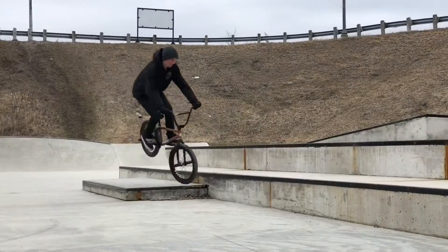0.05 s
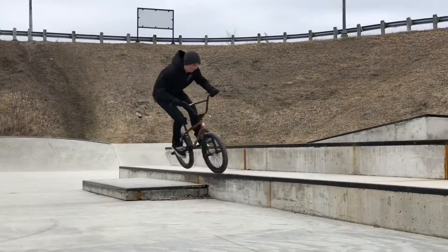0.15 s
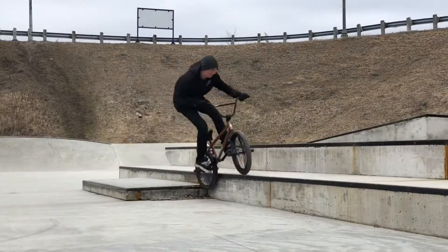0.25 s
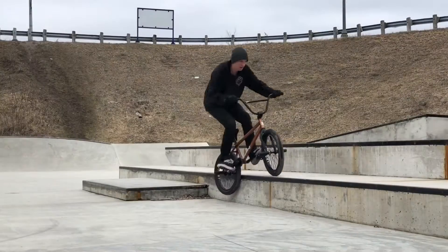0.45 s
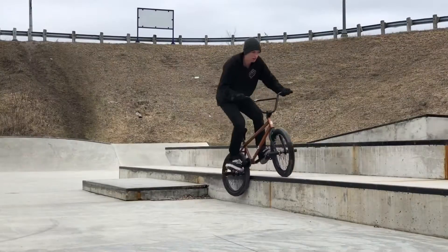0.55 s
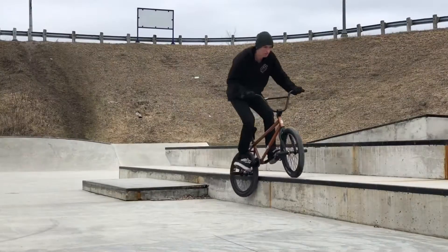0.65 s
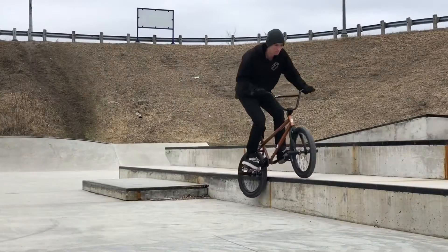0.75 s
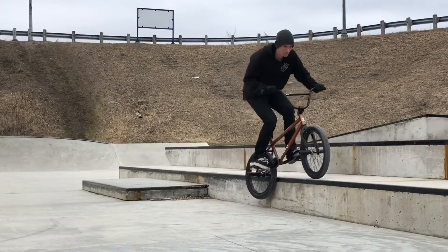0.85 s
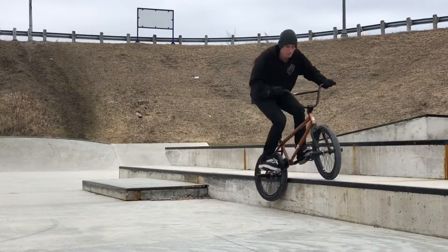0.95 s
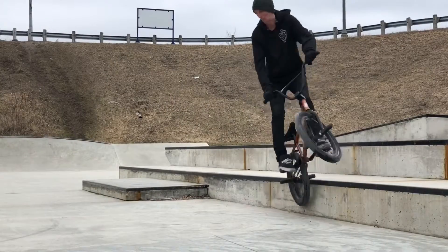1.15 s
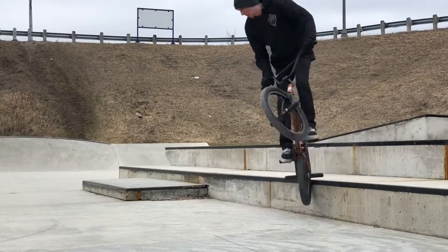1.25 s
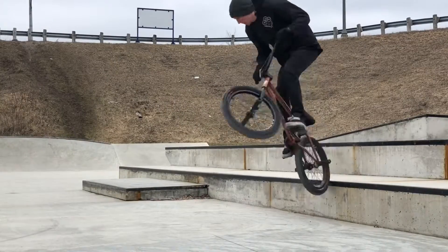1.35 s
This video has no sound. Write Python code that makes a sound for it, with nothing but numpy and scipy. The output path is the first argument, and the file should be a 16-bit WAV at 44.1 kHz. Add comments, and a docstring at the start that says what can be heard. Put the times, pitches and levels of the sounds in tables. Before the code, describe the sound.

A bicycle grinds along a concrete ledge at an outdoor skatepark. A sharp, rattling knock comes first, then a juddering, gritty scrape with hissing scuffs, and a few small clacks as it leaves, over faint low rumble.

```python
"""Bicycle peg grind

A stunt bicycle hops onto a concrete ledge in an open skatepark. The rear peg lands with a hard double
knock that rings the frame, judders in stick-slip as it starts to slide, then scrapes along the edge
with hissing scuffs. The bicycle clatters off; concrete banks answer faintly over a low outdoor rumble."""
import sys
import numpy as np
from scipy import signal
from scipy.fft import rfft, irfft, next_fast_len
from scipy.io import wavfile
from scipy.ndimage import uniform_filter1d

SR = 44100
rng = np.random.default_rng(int(sys.argv[2]) if len(sys.argv) > 2 else 0)


def dump(signal):
    """Clip the signal to [-1, 1] and save it as 16-bit WAV at the path in sys.argv[1]."""
    limited = np.clip(np.atleast_2d(signal).T, -1, 1)
    pcm = np.round(limited * 32767).astype(np.int16)
    wavfile.write(sys.argv[1], SR, pcm)


N = 61739

# Spectrum of metal striking concrete: freq_hz, density_db
IMPACT_SPECTRUM = [(100, -16), (600, 2), (1200, -2), (2200, -8.5), (3000, -8.5), (4800, -7.5),
                   (6000, -13.5), (8200, -11), (10000, -26), (13200, -17.5), (16000, -35.5)]


def undb(db):
    """Decibels to gain."""
    return np.exp(np.asarray(db) * np.log(10) / 20)


def unit(x):
    """Scale to rms 1."""
    return x / np.sqrt(np.mean(x ** 2))


def since(start_s):
    """Seconds since start_s, zero before it."""
    return np.maximum(np.arange(N) / SR - start_s, 0)


def fade(age_s, t60_s):
    """Exponential decay, 60 dB in t60_s."""
    return np.exp(-np.log(1000) * age_s / t60_s)


def add(out, start_s, sound):
    """Mix sound into out from start_s on."""
    i = int(np.clip(start_s * SR, 0, N - 1))
    out[i:i + len(sound)] += sound[:N - i]


def butter(x, kind, cutoff_hz):
    """Second-order low-pass or high-pass."""
    return signal.sosfilt(signal.butter(2, cutoff_hz, kind, fs=SR, output="sos"), x)


def colour(x, spectrum):
    """Filter by (freq_hz, gain_db) points; rms 1."""
    freq_hz, gain_db = np.array(spectrum).T
    size = next_fast_len(N, real=True)
    bins_hz = np.maximum(np.fft.rfftfreq(size, 1 / SR), 1)
    gain = undb(np.interp(np.log(bins_hz), np.log(freq_hz), gain_db))
    return unit(irfft(rfft(x, size) * gain, size)[:N])


def walk(rate_hz):
    """Smooth random wander; rms 1."""
    span = max(int(SR / rate_hz), 1)
    return unit(uniform_filter1d(uniform_filter1d(rng.standard_normal(N), span), span))


def grit(size=N):
    """Dense tiny collisions of uneven size."""
    grains_per_s, spread_db = 9000, 2.5
    grains = (rng.random(size) < grains_per_s / SR) * rng.standard_normal(size)
    return grains * undb(spread_db * rng.standard_normal(size))


def ring(modes):
    """Damped modes struck together, from (freq_hz, level_db, t60_s) rows."""
    age_s = np.arange(int(max(t60_s for _, _, t60_s in modes) * SR)) / SR
    return sum(undb(db) * np.sin(2 * np.pi * hz * age_s) * fade(age_s, t60_s) for hz, db, t60_s in modes)


def snaps(contacts):
    """Noise snaps of hard contact, from (start_s, level_db) rows."""
    decay_s = 0.0017
    decay = np.exp(-since(0)[:SR // 20] / decay_s)
    envelope = np.zeros(N)
    for start_s, level_db in contacts:
        add(envelope, start_s, undb(level_db) * decay)
    return envelope * colour(rng.standard_normal(N), IMPACT_SPECTRUM)


def air():
    """Low outdoor rumble that wavers slightly and slowly eases."""
    # Rumble spectrum: freq_hz, density_db
    spectrum = [(20, 0.5), (50, 0), (120, -0.5), (230, -8.5), (350, -7), (700, -15.5), (1300, -19),
                (2500, -29.5), (5000, -42), (9000, -47.5), (16000, -53.5)]
    mean_db, swell_db, fall_db_per_s = -49, 1, 1.5
    level_db = mean_db + swell_db * walk(rate_hz=6) - fall_db_per_s * (since(0) - N / SR / 2)
    return colour(rng.standard_normal(N), spectrum) * undb(level_db)


def banks(source):
    """Faint, dull reflections off the concrete banks."""
    level_db, delay_s = -28.5, 0.018
    age_s = since(delay_s)
    tail = butter(grit(), "lowpass", cutoff_hz=1503) * (age_s > 0) * fade(age_s, t60_s=0.65)
    return undb(level_db) * signal.fftconvolve(source, tail / np.linalg.norm(tail))[:N]


def ticks():
    """Thin ticks of the rolling bicycle before and after the ledge."""
    # Ticks: start_s, level_db
    contacts = [(.0174, -49.5), (.0283, -60.5), (.0533, -52.5), (.063, -54.5), (.0732, -56.5),
                (1.258, -54.5), (1.371, -67.5)]
    return butter(snaps(contacts), "highpass", cutoff_hz=4000)


def clacks():
    """Glancing blows of the peg: a snap and a short hollow ring."""
    # Blows: start_s, ring_db, snap_db, low_modes_db
    blows = [(0.1778, -24, -22, -9.5), (0.1799, -44, -36.5, 10), (0.2286, -38.5, -58, 10.5),
             (0.36, -32, -49, 3), (.496, -42, -54, 6), (1.138, -47.5, -57, 9.5), (1.141, -32, -42.5, 2.5),
             (1.1432, -38, -44, 0), (1.154, -42, -41, -17), (1.172, -36, -57, 1)]
    # Peg and hub modes: freq_hz, level_db, t60_s
    peg_modes = [(373.7, -9, 0.091), (636, -6.5, .07), (727, -16, 0.055), (1004, -1, 0.0094),
                 (1431, -1, .013), (1657, 4, 0.0083), (3830, -27.5, 0.0077)]
    low_below_hz = 1200
    out = snaps([(start_s, snap_db) for start_s, _, snap_db, _ in blows])
    for start_s, ring_db, _, low_modes_db in blows:
        modes = [(hz, db + low_modes_db * (hz < low_below_hz), t60_s) for hz, db, t60_s in peg_modes]
        add(out, start_s, undb(ring_db) * ring(modes))
    return out


def scuffs():
    """Rough patches of the edge give short swells of hiss that ring in the steel."""
    # Gaussian swells: centre_s, sigma_s, level_db, centre_hz, sigma_octaves
    swells = [(.448, 0.01, -48, 4930, 0.38), (0.451, 0.022, -60.5, 11000, 0.73),
              (0.501, 0.021, -52, 2600, 1), (0.559, 0.0085, -48.5, 7300, 0.19),
              (0.568, 0.019, -58, 12300, .3), (0.589, 0.016, -56.5, 4715, 0.4),
              (.655, 0.0055, -59, 8150, 1), (0.845, 0.013, -60.5, 7860, 0.33),
              (0.894, 0.013, -49.5, 4200, 0.69), (0.895, 0.011, -53, 10900, 0.87),
              (0.932, 0.01, -51.5, 10700, 0.96), (0.971, 0.0098, -51, 4480, 0.76),
              (1.014, 0.022, -64, 4840, 0.32), (1.104, 0.021, -66.5, 9900, .5),
              (1.163, 0.011, -54, 4630, 0.64), (1.213, 0.013, -57.5, 3700, 0.79)]
    # Steel resonances: freq_hz, width_hz, boost_db
    resonances = [(2626, 89, 13), (3170, 100, 9), (3730, 60, 10.5), (4030, 46, 3), (5050, 110, 5),
                  (5570, 90, 8.5), (7100, 220, 5), (8320, 120, 12), (12900, 250, 8)]
    size = 8192
    bins_hz = np.maximum(np.fft.rfftfreq(size, 1 / SR), 1)
    offset_s = (np.arange(size) - size / 2) / SR
    steel = undb(sum(db / (1 + (2 * (bins_hz - hz) / width_hz) ** 2) for hz, width_hz, db in resonances))
    out = np.zeros(N)
    for centre_s, sigma_s, level_db, centre_hz, sigma_octaves in swells:
        band = np.exp(-0.5 * (np.log2(bins_hz / centre_hz) / sigma_octaves) ** 2)
        hiss = unit(irfft(rfft(grit(size)) * steel * band))
        envelope = np.exp(-0.5 * (offset_s / sigma_s) ** 2)
        add(out, centre_s + offset_s[0], undb(level_db) * hiss * envelope)
    return out


def scrape():
    """The peg grinds over grit, chattering, louder the harder it is pressed."""
    # Level from peg pressure: time_s, level_db
    pressure = [(0.239, -42), (.28, -44.5), (.37, -46.5), (0.421, -51), (.51, -49.5), (.6, -49),
                (.73, -52.5), (.84, -47.5), (.93, -51), (1.0, -56), (1.07, -60.5), (1.13, -59.5),
                (1.16, -44), (1.2, -57.5), (1.26, -87.5)]
    # Scrape spectrum: freq_hz, density_db
    spectrum = [(150, -12), (270, -10.5), (345, 3.5), (430, 2), (750, 0.5), (1450, -5.5), (2200, -11.5),
                (4200, -18.5), (5300, -15.5), (6400, -20.5), (7600, -13.5), (9800, -30.5), (12700, -24),
                (16000, -33)]
    chatter_db, chatter_hz = 1, 72
    level_db = np.interp(since(0), *np.array(pressure).T, left=-120)
    return colour(grit(), spectrum) * undb(level_db + chatter_db * walk(chatter_hz))


def judder():
    """The loaded peg sticks and slips at a near-steady rate: a short buzz that dulls as it dies."""
    # Buzz partials: harmonic, level_db, release_at_s, t60_s
    partials = [(1, -12.5, 0.313, 0.27), (2, -6, 0.3, 0.57), (3, 0.5, 0.33, .42), (4, -4, 0.35, 0.26),
                (5, -2.5, 0.32, 0.11), (6, -17, 0.336, 0.098), (7, -16, .33, .25)]
    pitch_hz, jitter = 229.6, 0.0024
    start_s, rise_s, gain_db, flutter_db = 0.27, 0.033, -30, 1.25
    phase = 2 * np.pi * np.cumsum(pitch_hz * (1 + jitter * walk(rate_hz=160))) / SR
    buzz = sum(undb(level_db) * np.cos(harmonic * phase) * fade(since(release_at_s), t60_s)
               for harmonic, level_db, release_at_s, t60_s in partials)
    onset = np.minimum(since(start_s) / rise_s, 1)
    return buzz * onset * undb(gain_db + flutter_db * walk(rate_hz=147))


def knocks():
    """Each landing blow cracks at the contact, rings the frame and shakes loose parts."""
    # Blows: start_s, thud_db, crack_db, crack_s, rattle_db
    blows = [(0.1825, -32, -30.5, 0.0023, -33), (0.1997, -29, -55, 0.0037, -67.5),
             (0.202, -42.5, -40, .005, -59), (0.231, -32.5, -50, 0.006, -58),
             (0.2429, -9, -6.5, 0.0043, -18.5), (0.2489, -3, -32.5, 0.0033, -31),
             (0.2514, -14.5, -29, 0.0068, -40.5), (0.2673, -28.5, -45.5, 0.0041, -55),
             (.2707, -26, -39, 0.0017, -48.5)]
    # Frame, wheel and tyre modes: freq_hz, level_db, t60_s
    frame_modes = [(120.6, -13.5, .16), (136.7, -17.5, 0.22), (168, -17, 0.16), (246, -9.5, .08),
                   (320.4, -12, .07), (360.3, -1, 0.049), (418.6, -10.5, 0.045), (468.6, -9.5, 0.056),
                   (522.8, -18, 0.19), (694.5, -11.5, 0.053), (938, -7.5, .04), (1121, -20, 0.038),
                   (1882, -17, 0.028), (2682, -20, 0.034)]
    # Thin, lasting tube modes after the landing: freq_hz, level_db, t60_s
    tube_modes = [(2873, -50.5, 0.95), (2019, -62, .9), (2230, -55, 1.4), (2440, -55, .6)]
    # Spectrum of the loose parts: freq_hz, density_db
    rattle_spectrum = [(40, -7), (110, 6), (250, 3.5), (400, 11), (1000, 3), (2200, -6), (3500, -8.5),
                       (6000, -19), (8200, -12.5), (10000, -27), (13000, -28.5), (16000, -32.5)]
    crack_rise_s, rattle_rise_s, roughness = 0.001, 0.00296, 0.22
    crack_age_s, rattle_age_s = since(0)[:SR // 20], since(0)[:SR // 2]
    crack_onset = 1 - np.exp(-crack_age_s / crack_rise_s)
    shake = (1 - np.exp(-rattle_age_s / rattle_rise_s)) * fade(rattle_age_s, t60_s=0.14)
    thud = ring(frame_modes)
    ringing, crack_envelope, rattle_envelope = np.zeros((3, N))
    add(ringing, start_s=0.32, sound=ring(tube_modes))
    for start_s, thud_db, crack_db, crack_s, rattle_db in blows:
        burst = crack_onset * np.exp(-(crack_age_s / crack_s) ** 2)
        add(ringing, start_s, undb(thud_db) * thud)
        add(crack_envelope, start_s, undb(crack_db) * burst)
        add(rattle_envelope, start_s, undb(rattle_db) * shake)
    rough_noise = rng.standard_normal(N) * np.exp(roughness * walk(rate_hz=600))
    crack = crack_envelope * colour(rng.standard_normal(N), IMPACT_SPECTRUM)
    rattle = rattle_envelope * colour(rough_noise, rattle_spectrum)
    return ringing + crack + rattle


def scene():
    """Bicycle, reflections and open air; mono."""
    bicycle = knocks() + clacks() + ticks() + judder() + scrape() + scuffs()
    bicycle = butter(bicycle, "highpass", cutoff_hz=136)
    return (bicycle + banks(bicycle) + air())[None]


def record(dry):
    """Clip at full scale, then cut the top treble steeply."""
    cutoff_hz = 15900
    lowpass = signal.ellip(8, 0.2, 70, cutoff_hz, fs=SR, output="sos")
    return signal.sosfilt(lowpass, np.clip(dry, -1, 1))


dry = scene()
out = record(dry)
dump(out)
```